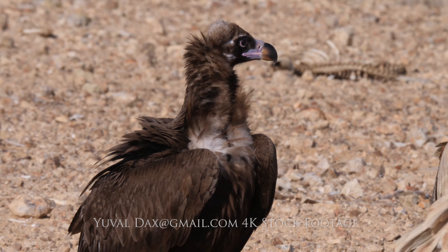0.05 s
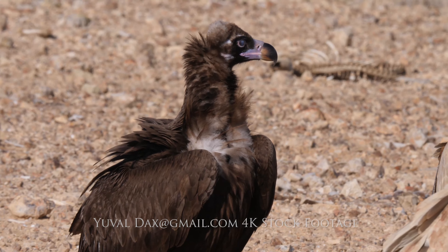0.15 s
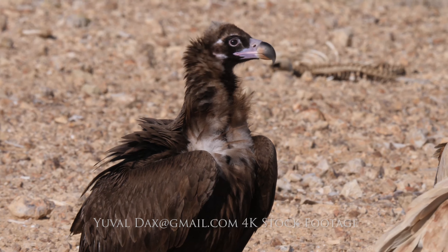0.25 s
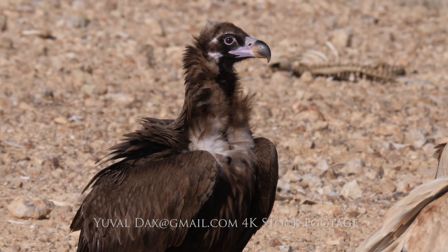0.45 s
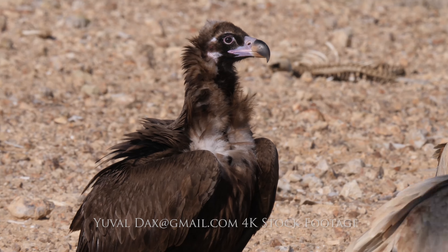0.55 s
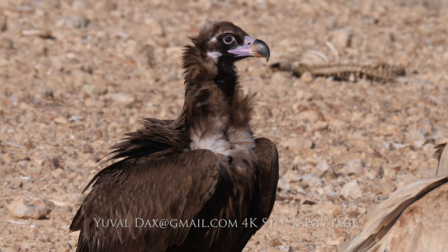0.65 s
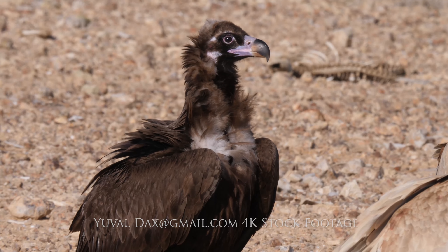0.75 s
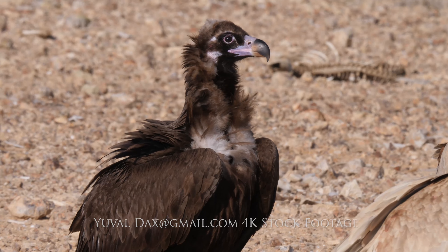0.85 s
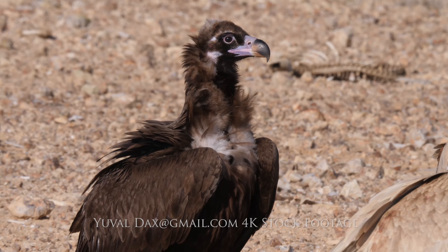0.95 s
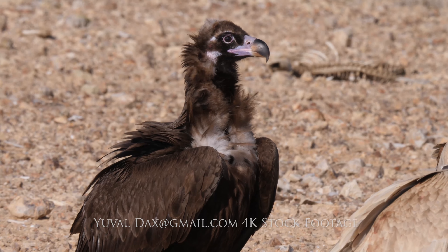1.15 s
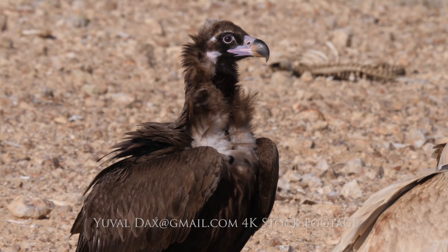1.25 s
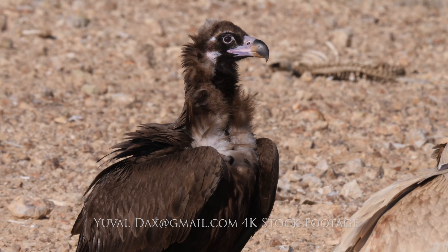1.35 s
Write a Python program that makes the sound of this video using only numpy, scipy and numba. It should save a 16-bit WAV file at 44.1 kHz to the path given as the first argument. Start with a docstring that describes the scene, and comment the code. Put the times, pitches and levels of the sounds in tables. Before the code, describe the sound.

One rasping hiss from a large bird, near and slightly right, sharpening almost to a whistle, with soft low whooshes, then a few dry stone clicks, in open air with quiet wind rumble and little echo.

```python
"""Open stony ground: a vulture hisses once over a low wind rumble, grit ticks and soft low whooshes.
A peep and a thin groan (wavering sines) open it; rasping air, noise pulsed in irregular puffs, rings
the throat, sharpens to a near whistle and ends in a tiny squeak, a short buzz of harmonics.
The whooshes, probably wingbeats, are swelling band-passed noise; grit is fine crackle plus
decaying clicks. Wind is gusting coloured noise; the ground adds a short echo."""
import sys
import numpy as np
from scipy import signal
from scipy.fft import rfft, irfft
from scipy.io import wavfile
from scipy.ndimage import uniform_filter1d
from numba import njit

SR = 44100
rng = np.random.default_rng(int(sys.argv[2]) if len(sys.argv) > 2 else 0)


def log_audio(samples):
    """Write samples as a 16-bit WAV file to the path given in sys.argv[1]."""
    # one column per channel
    frames = np.atleast_2d(samples).T
    # limit to full scale, then quantise
    limited = np.clip(frames, -1, 1)
    pcm = np.round(limited * 32767).astype(np.int16)
    wavfile.write(sys.argv[1], SR, pcm)


N = 61739

# Wind rumble level. Each row: time in seconds, level in dB.
GUSTS = [(.16, -59.5), (.21, -51.5), (.27, -57), (.7, -57), (.76, -54.5), (1.05, -63), (1.26, -56.5),
         (1.39, -62.5)]
# Spectra of wind rumble and distant hush. Each row: frequency in Hz, relative level in dB.
RUMBLE_SPECTRUM = [(55, -28), (72, -18), (95, -9.5), (130, -1), (175, -5), (240, -13.5), (330, -11),
                   (600, -16.5), (1500, -29.5), (4000, -47)]
DISTANT_SPECTRUM = [(300, -19), (600, 4), (1500, -1.5), (3000, -3), (8500, -11.5), (12000, -16),
                    (15500, -29)]
DISTANT_DB = -65

# Level of grit scuffed underfoot. Each row: time in seconds, level in dB.
SCUFF = [(0, -63.5), (.55, -58), (.745, -55), (.79, -58.5), (.9, -56.5), (1.08, -62.5), (1.39, -62.5)]
# Ring of the finest grit. Each row: centre in Hz, level in dB re scuff.
GRIT_RINGS = [(4500, -5), (7500, -11.5), (10000, -4), (12500, -23)]
# Grit ticks. Each row: start in seconds, level in dB, ring in Hz, share of dull knock (0-1).
TICKS = [(.064, -42.5, 10700, 0.2), (0.741, -35, 8190, 0), (0.757, -39, 5580, 0.4),
         (0.82, -35.5, 4500, 0.28), (0.8714, -30.5, 4300, 0.2), (0.9127, -35.5, 9600, 0.97),
         (0.9504, -35.5, 9600, 0.94), (1.2602, -39, 9840, 0.15)]
GRIT_PER_S, GRIT_JITTER, GRIT_SPREAD_DB = 1100, 0.61, 3.5
GRIT_WIDTH_RATIO, TICK_TAIL_WIDTH_RATIO = 0.77, 0.4  # width / centre
TICK_ATTACK_S, TICK_DECAY_S, TICK_CRACK_DB, TICK_CRACK_WIDTH_HZ = 0.00012, 0.00072, -3.5, 7100
TICK_TAIL_S, TICK_TAIL_DB = 0.014, -19.5
KNOCK_HZ, KNOCK_DECAY_S, KNOCK_DB = 759.5, 0.0003, 9

# Wingbeats. Each row: peak in seconds, rise in seconds, fall in seconds, level in dB before WING_DB,
# centre in Hz.
WINGBEATS = [(0.14, 0.03, 0.07, -42.5, 624), (0.384, 0.053, 0.043, -43, 536),
             (0.508, 0.036, 0.027, -43, 550), (0.64, 0.058, 0.04, -45.5, 521),
             (0.714, 0.03, 0.028, -42.5, 511), (.947, 0.038, 0.063, -51.5, 516),
             (1.267, 0.028, 0.024, -53.5, 480), (1.35, .014, 0.024, -58, 470)]
# Feathers brushing. Each row: frequency in Hz, relative level in dB.
FEATHER_SPECTRUM = [(300, -17), (1000, 22), (2000, -23), (4500, -9), (9000, -0.5), (12000, -9),
                    (15500, -18)]
# Narrow strands in the whoosh. Each row: centre in Hz, width in Hz, lift in dB.
WING_HOLLOW = [(456.4, 22, 7.5), (520, 9.3, 5), (630.3, 12.4, 9.5)]
WING_WIDTH_RATIO, WING_SKIRT_DB, FEATHER_DB, WING_DB = 0.66, -16, -9, -2.5

# Opening groan. Each row: time in seconds, pitch in Hz, fundamental in dB, overtones in dB.
WHEEZE = [(.085, 411, -90, -85), (.104, 403.8, -64, -52.5), (.18, 414, -58, -41.5),
          (.2, 392.3, -49.5, -49.5), (.228, 381.3, -48, -47), (.258, 381.3, -57, -65),
          (.31, 382.4, -57, -70), (.36, 404.9, -52, -58), (.39, 410, -69, -77.5)]
# Its overtones. Each row: multiple of the pitch, level in dB re the overtone column.
WHEEZE_PARTIALS = [(2, 2), (3, -12), (4, -8), (5, -10.5)]
WHEEZE_WAVER_RATIO, WHEEZE_FLUTTER_DB = .02, 3.2  # rms
PEEP_S, PEEP_HZ, PEEP_DB, PEEP_DECAY_S = 0.0896, 1075, -44.5, 0.027

# Force of the hiss. Each row: time in seconds, level in dB before WINDPIPE_DB.
EFFORT = [(.09, -62), (.14, -49), (.174, -41), (.196, -42), (.228, -31.5), (.246, -26), (.282, -23.5),
          (.325, -30.5), (.394, -33.5), (.49, -35.5), (.512, -44), (.55, -42), (.578, -53.5), (.63, -91)]
# Broad rush of air. Each row: frequency in Hz, relative level in dB.
AIR_SPECTRUM = [(250, -28), (450, -13), (1300, -6), (1900, 0.5), (4000, 1.5), (6300, -2), (7700, -6.5),
                (9600, -8.5), (11500, -12.5), (15500, -39)]
# Main throat resonance, then whistling resonance of the glottis.
# Each row: time in seconds, centre in Hz, width per filter stage in Hz, level in dB re effort.
THROAT = [(.17, 1600, 910, -5), (.206, 1500, 500, 2), (.214, 2010, 330, 2), (.25, 2084, 480, -5.5),
          (.28, 2280, 444, -8), (.31, 2110, 550, -11), (.335, 1834, 700, -2.5), (.385, 1780, 500, -5.5),
          (.43, 2030, 700, -1.5), (.453, 1930, 330, 0), (.485, 1840, 196, 5.5), (.52, 1880, 400, -0.5)]
GLOTTIS = [(.228, 4140, 900, -14.5), (.242, 4200, 800, -5), (.266, 4470, 300, -3), (.288, 4220, 654, -2.5),
           (.315, 4260, 700, -4.5), (.335, 4410, 900, -26), (.402, 5100, 900, -8.5), (.414, 4800, 750, 2.5),
           (.433, 4500, 750, 1), (.453, 4700, 950, -5.5), (.476, 4860, 1000, -3.5), (.55, 5000, 1100, -4.5)]
# Second (mouth) resonance, resonance under the palate, air at the beak.
# Each row: time in seconds, centre in Hz, level in dB re effort.
MOUTH = [(.2, 3170, -13), (.25, 3450, -24), (.29, 3230, -11), (.335, 2590, -8), (.385, 3100, 2),
         (.44, 2540, -8), (.48, 3110, -1.5), (.55, 2880, -3)]
PALATE = [(.215, 6560, -16), (.245, 6500, -4), (.28, 5820, -7), (.315, 6470, -7.5), (.35, 7300, -7.5),
          (.372, 7600, -5.5), (.4, 7600, -10), (.43, 8100, -9), (.5, 7740, -14)]
BEAK = [(.14, 9600, -29), (.225, 9700, -8), (.25, 9200, -27), (.295, 9000, -2.5), (.34, 9100, -16),
        (.368, 8970, -4.5), (.395, 8950, -17), (.425, 8980, -7.5), (.49, 9500, -16.5), (.525, 8300, -2),
        (.57, 8420, -32)]
MOUTH_WIDTH_HZ, PALATE_WIDTH_HZ, BEAK_WIDTH_HZ = 1000, 1500, 1700  # per filter stage
# Fixed windpipe resonances. Each row: centre in Hz, width in Hz, lift in dB.
WINDPIPE = [(1110, 160, 6), (1860, 90, 3), (2225, 70, 6), (2450, 110, 8), (2830, 80, 8), (3450, 110, 10),
            (4420, 130, 6)]
WINDPIPE_DB = -3.5
RASP_PER_S, RASP_JITTER, RASP_SCATTER_DB = 300, .3, 2.5
RASP_DECAY_S, RASP_SMOOTH = .0018, 1.1  # RASP_SMOOTH: steady flow under the puffs
SUSTAIN_S = .016
AIR_DB, AIR_SAG_DB_PER_DB, AIR_SAG_RANGE_DB = -2, 0.24, 10  # sag: loss per dB of effort below peak

# Spits of air as the beak opens and closes. Each row: start in seconds, decay in seconds, level in dB.
SPITS = [(.147, 0.031, -46.5), (0.167, 0.013, -42), (0.527, 0.0058, -41), (0.546, 0.0034, -46.5)]
# Their colour. Each row: frequency in Hz, relative level in dB.
SPIT_SPECTRUM = [(1000, -6), (3400, -4), (5500, -10), (6800, -4), (9800, 6), (12500, -11), (15500, -26)]

TONE_S, TONE_HZ, TONE_DB, TONE_SPREAD_S = 0.2696, 4410, -27, 0.013

SQUEAK_S, SQUEAK_HZ, SQUEAK_DB = .5335, 718.7, -29
SQUEAK_RISE_S, SQUEAK_FALL_S, SQUEAK_JITTER_RATIO = 0.0074, 0.0018, 0.0128
# Squeak colour. Each row: frequency in Hz, relative level in dB.
SQUEAK_SPECTRUM = [(600, -44), (1500, -6), (2880, 2), (3600, -3.5), (5700, -4.5), (7100, -9), (8000, 1),
                   (8700, 2), (9500, -22), (15000, -31)]

# Side of the bird. Each row: frequency in Hz, left minus right in dB.
BIRD_BALANCE = [(400, 0.5), (2400, -3), (4400, -3), (8100, -.3)]
# Width of the ground's echo. Each row: frequency in Hz, side level in dB re middle.
ECHO_WIDTH = [(120, -28), (700, -2.5), (2500, 4), (5000, 2.5), (8000, -8.5), (12000, 3.5)]
BIRD_ECHO_DB, AROUND_ECHO_DB, ECHO_T60_S = -10, -10, .13
LOW_CUT_HZ, TOP_HZ = 82, 15600


def undb(db):
    """Decibels to gain."""
    return 10 ** (np.asarray(db) / 20)


def unit(x):
    """Scale to rms 1."""
    return x / (np.sqrt(np.mean(x ** 2)) + 1e-12)


def since(start_s):
    """Seconds after start_s, negative before it."""
    return np.arange(N) / SR - start_s


def curve(rows):
    """Each column of a table, joined by straight lines in time."""
    rows = np.array(rows, float)
    rows = rows[np.argsort(rows[:, 0])]
    return [np.interp(since(0), rows[:, 0], col) for col in rows[:, 1:].T]


def response(points):
    """A table of (Hz, dB) on the frequency grid, joined over log frequency."""
    hz, db = np.array(points, float).T
    return np.interp(np.log(np.fft.rfftfreq(N, 1 / SR) + 1), np.log(hz), db)


def equalize(x, db):
    """Apply a dB gain per frequency bin."""
    return irfft(rfft(x) * undb(db), N)


def colour(x, points):
    """Shape a spectrum, at rms 1."""
    return unit(equalize(x, response(points)))


def noise():
    """White noise, rms 1."""
    return rng.standard_normal(N)


def waver():
    """Random waver, rms 1, mostly below about 100 Hz."""
    return colour(noise(), [(5, 0), (70, 0), (200, -30), (1000, -100)])


def turning(hz):
    """Phase in radians of a moving pitch."""
    return 2 * np.pi * np.cumsum(hz) / SR


@njit
def svf(x, g, k):
    """State-variable band-pass with moving centre and width."""
    y, band, low = np.empty(len(x)), 0., 0.
    for i in range(len(x)):
        v = (band + g[i] * (x[i] + 1e-18 - low)) / (1 + g[i] * (g[i] + k[i]))
        band, low, y[i] = 2 * v - band, low + 2 * g[i] * v, k[i] * v
    return y


def ring(x, hz, width_hz, order=2):
    """Cascaded resonance; white noise keeps about the same level whatever the width."""
    angle = np.pi * np.clip(hz * np.ones(N), 20, SR * .45) / SR
    width = np.maximum(width_hz * np.ones(N), 20)
    for _ in range(order):
        x = svf(x, np.tan(angle), 2 * np.pi * width / SR / np.sin(2 * angle))
    return x * np.sqrt(order * SR / (np.pi * width))


def lift(x, bands):
    """Raise narrow bands by adding resonant peaks."""
    out = x
    for hz, width_hz, db in bands:
        b, a = signal.iirpeak(hz, hz / width_hz, SR)
        out = out + (undb(db) - 1) * signal.lfilter(b, a, x)
    return out


def pulses(rate, jitter, scatter_db):
    """Clicks of uneven size, with log-normal gaps of median 1 / rate."""
    chance = rng.standard_normal((N // 20, 2))
    at = np.cumsum(np.exp(jitter * chance[:, 0])) * SR / rate
    keep = at < N - 2
    at, size, out = at[keep], undb(scatter_db * chance[keep, 1]), np.zeros(N)
    # split each click between two samples for sub-sample timing
    np.add.at(out, at.astype(int), size * (1 - at % 1))
    np.add.at(out, at.astype(int) + 1, size * (at % 1))
    return out


def sustain(x):
    """Steady air holds a resonance at an even level; only its fine grain stays."""
    power = np.abs(uniform_filter1d(x ** 2, int(SUSTAIN_S * SR)))
    return x / np.sqrt(power + 1e-12)


def wind():
    """Gusting low rumble under a steady distant hush, both coloured noise."""
    rumble = undb(curve(GUSTS)[0]) * colour(noise(), RUMBLE_SPECTRUM)
    return rumble + undb(DISTANT_DB) * colour(noise(), DISTANT_SPECTRUM)


def grit():
    """Small stones ring and knock, damped within milliseconds, over a fine crackle of tiny impacts."""
    crackle = 0
    for hz, db in GRIT_RINGS:
        impacts = pulses(GRIT_PER_S, GRIT_JITTER, GRIT_SPREAD_DB)
        crackle = crackle + undb(db) * unit(ring(impacts, hz, GRIT_WIDTH_RATIO * hz))
    out = undb(curve(SCUFF)[0]) * crackle
    for start, db, hz, knock in TICKS:
        t = since(start)
        age = np.maximum(t, 0)
        crack = undb(TICK_CRACK_DB) * ring(noise(), hz, TICK_CRACK_WIDTH_HZ, order=4)
        swell = np.tanh(age / TICK_ATTACK_S) * np.exp(-age / TICK_DECAY_S)
        stone = swell * (np.sin(2 * np.pi * hz * age) + crack)
        rattle = np.exp(-age / TICK_TAIL_S) * ring(noise(), hz, TICK_TAIL_WIDTH_RATIO * hz)
        thud = np.exp(-age / KNOCK_DECAY_S) * np.sin(2 * np.pi * KNOCK_HZ * age)
        tick = stone + undb(TICK_TAIL_DB) * rattle - knock * undb(KNOCK_DB) * thud
        out = out + undb(db) * (t >= 0) * tick
    return out


def wings():
    """Each beat pushes a hollow whoosh of band-passed air; the feathers brush along."""
    out = 0
    for peak, rise, fall, db, hz in WINGBEATS:
        t = since(peak)
        swell = np.exp(-np.maximum(-t / rise, t / fall) ** 2 / 2)
        air = ring(noise(), hz, WING_WIDTH_RATIO * hz)
        skirt = undb(WING_SKIRT_DB) * ring(noise(), hz, hz, order=1)
        feathers = undb(FEATHER_DB) * colour(noise(), FEATHER_SPECTRUM)
        out = out + undb(db) * swell * (air + skirt + feathers)
    return undb(WING_DB) * lift(out, WING_HOLLOW)


def wheeze():
    """Short peep, then an unsteady groan that loses its overtones as the air nears full force."""
    hz, low_db, high_db = curve(WHEEZE)
    phase = turning(hz * (1 + WHEEZE_WAVER_RATIO * waver()))
    partials = [(0.99, low_db)]  # fundamental slightly flat of its overtones
    partials += [(round(k), high_db + db) for k, db in WHEEZE_PARTIALS]
    groan = 0
    for k, db in partials:
        groan = groan + undb(db + WHEEZE_FLUTTER_DB * waver()) * np.sin(k * phase)
    age = np.maximum(since(PEEP_S), 0)
    swell = np.tanh(10 * age / PEEP_DECAY_S) * np.exp(-age / PEEP_DECAY_S)
    peep = undb(PEEP_DB) * swell * np.sin(2 * np.pi * PEEP_HZ * age)
    return np.sqrt(2) * (groan + peep)  # levels are rms


def hiss():
    """Air torn into irregular puffs rings throat, glottis, mouth, palate and beak over a broad rush."""
    clicks = pulses(RASP_PER_S, RASP_JITTER, RASP_SCATTER_DB)
    puffs = signal.lfilter([1], [1, -np.exp(-1 / (RASP_DECAY_S * SR))], clicks)
    rasp = unit(RASP_SMOOTH + unit(puffs))
    effort_db = curve(EFFORT)[0]
    below_peak_db = np.minimum(effort_db.max() - effort_db, AIR_SAG_RANGE_DB)
    rush_db = AIR_DB - AIR_SAG_DB_PER_DB * below_peak_db
    out = undb(rush_db) * colour(rasp * noise(), AIR_SPECTRUM)
    cavities = [curve(THROAT), curve(GLOTTIS)]
    for table, width_hz in ((MOUTH, MOUTH_WIDTH_HZ), (PALATE, PALATE_WIDTH_HZ), (BEAK, BEAK_WIDTH_HZ)):
        hz, db = curve(table)
        cavities.append((hz, width_hz, db))
    for hz, width_hz, db in cavities:
        out = out + undb(db) * sustain(ring(rasp * noise(), hz, width_hz, order=3))
    return out * undb(effort_db)


def spits():
    """Sudden bright puffs of noise that fade at once."""
    level = 0
    for start, decay, db in SPITS:
        t = since(start)
        level = level + undb(db) * (t >= 0) * np.exp(-np.abs(t) / decay)
    return level * colour(noise(), SPIT_SPECTRUM)


def whistle():
    """Near full force the jet at the glottis locks into a short unsteady whistle."""
    phase = turning(TONE_HZ * (1 + WHEEZE_WAVER_RATIO / 2 * waver()))
    swell = np.exp(-(since(TONE_S) / TONE_SPREAD_S) ** 2 / 2)
    return np.sqrt(2) * undb(TONE_DB) * swell * np.sin(phase)


def squeak():
    """The closing airway buzzes for a few cycles; random harmonic phases smear each pulse."""
    t = since(SQUEAK_S)
    swell = np.exp(-np.maximum(-t / SQUEAK_RISE_S, t / SQUEAK_FALL_S))
    phase = turning(SQUEAK_HZ * (1 + SQUEAK_JITTER_RATIO * waver()))
    lags = rng.uniform(0, 2 * np.pi, size=18)
    buzz = sum(np.cos(k * phase + lag) for k, lag in enumerate(lags, 1))
    return undb(SQUEAK_DB) * swell * colour(buzz, SQUEAK_SPECTRUM)


def scatter(x, t60_s):
    """Stony ground throws back a short diffuse tail, widest around the middle frequencies."""
    t = np.arange(N // 4) / SR
    tails = rng.standard_normal((2, len(t))) * undb(-60 * t / t60_s)
    mid, side = (signal.fftconvolve(x, tail / np.linalg.norm(tail))[:N] for tail in tails)
    side = equalize(side, response(ECHO_WIDTH))
    return np.array([mid + side, mid - side]) / np.sqrt(2)


def scene():
    """Bird a little to the right; wings, grit and wind in the middle; echo in stereo."""
    bird = undb(WINDPIPE_DB) * lift(hiss(), WINDPIPE) + wheeze() + whistle() + spits() + squeak()
    around = wings() + grit()
    half_db = response(BIRD_BALANCE) / 2
    placed = np.array([equalize(bird, half_db), equalize(bird, -half_db)])
    echo = scatter(undb(BIRD_ECHO_DB) * bird + undb(AROUND_ECHO_DB) * around, ECHO_T60_S)
    return placed + around + wind() + echo


def record(dry):
    """High-pass the deepest rumble, then low-pass steeply at the top."""
    low_cut = signal.butter(4, LOW_CUT_HZ, "high", fs=SR, output="sos")
    top_cut = signal.ellip(10, .1, 80, TOP_HZ, fs=SR, output="sos")
    return signal.sosfilt(top_cut, signal.sosfilt(low_cut, dry))


dry = scene()
out = record(dry)
log_audio(out)
```